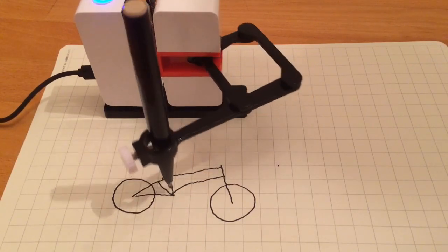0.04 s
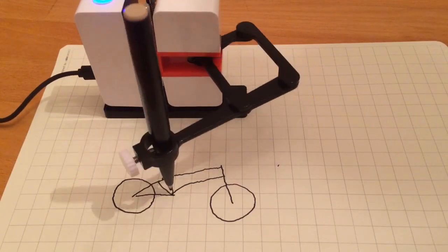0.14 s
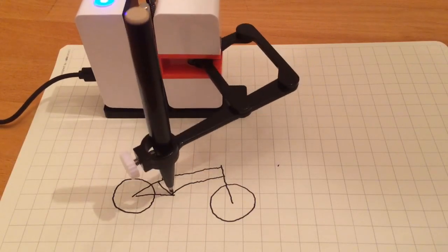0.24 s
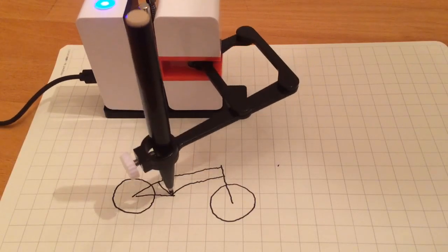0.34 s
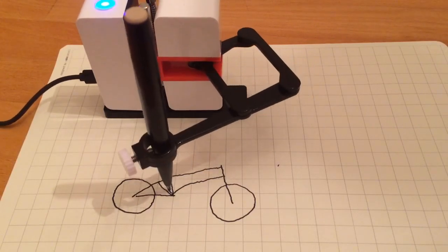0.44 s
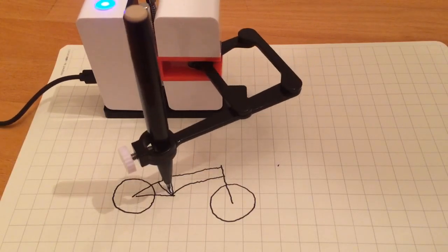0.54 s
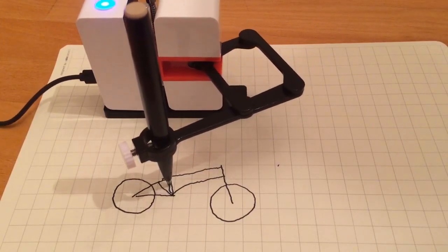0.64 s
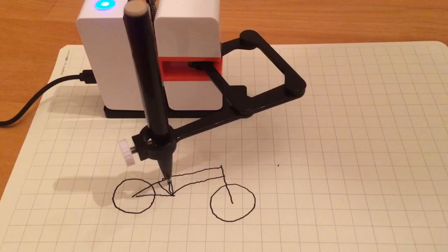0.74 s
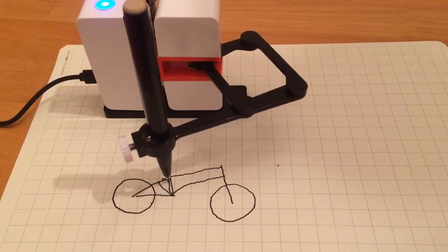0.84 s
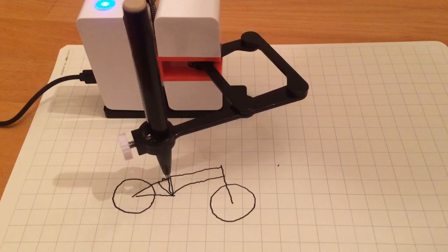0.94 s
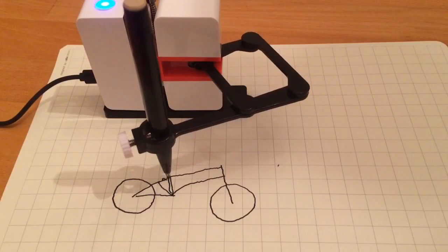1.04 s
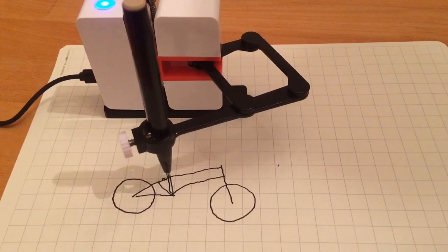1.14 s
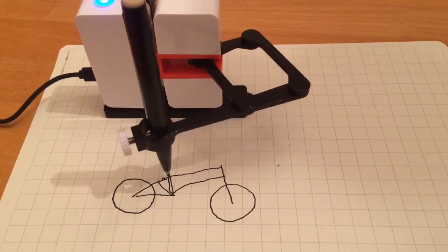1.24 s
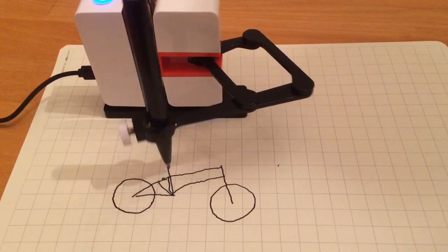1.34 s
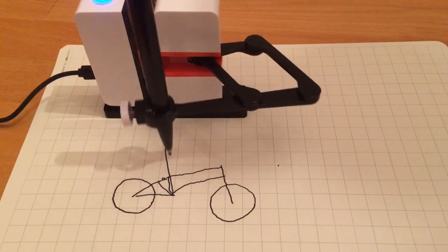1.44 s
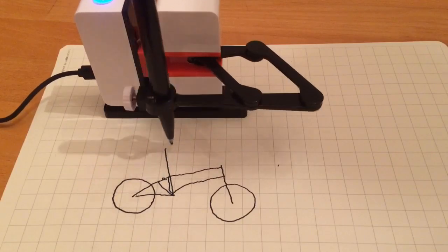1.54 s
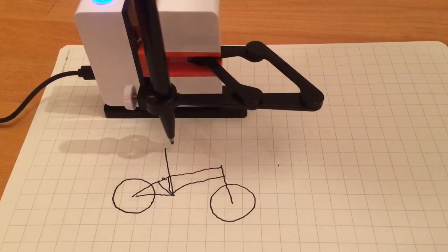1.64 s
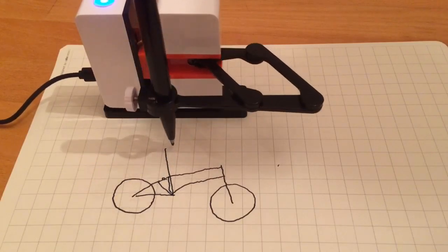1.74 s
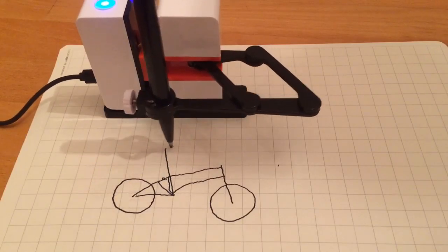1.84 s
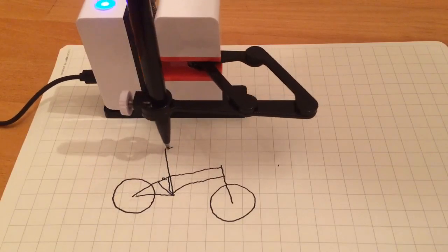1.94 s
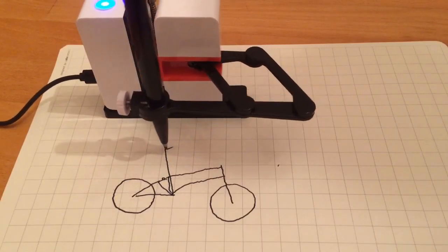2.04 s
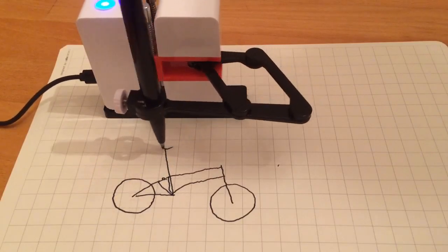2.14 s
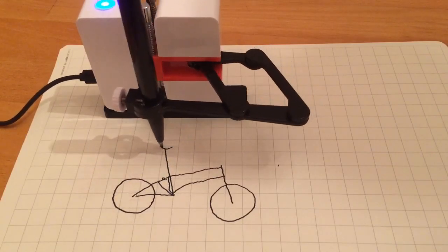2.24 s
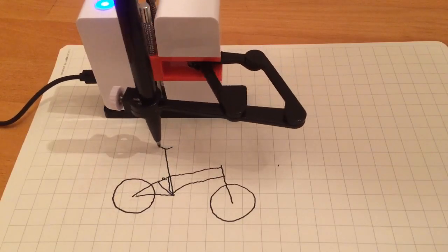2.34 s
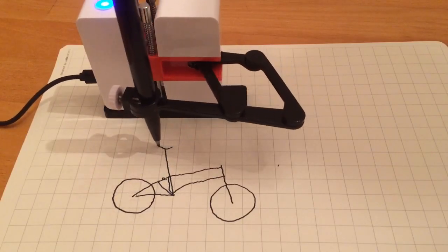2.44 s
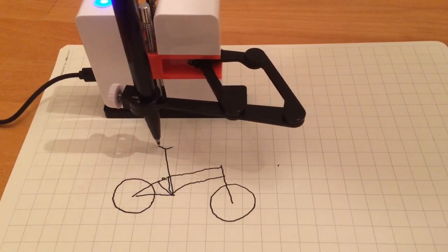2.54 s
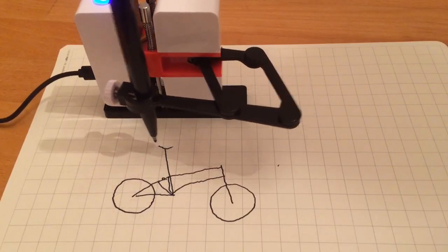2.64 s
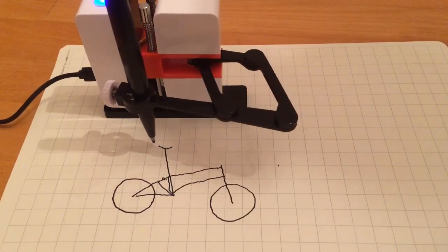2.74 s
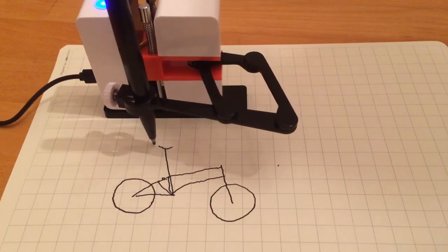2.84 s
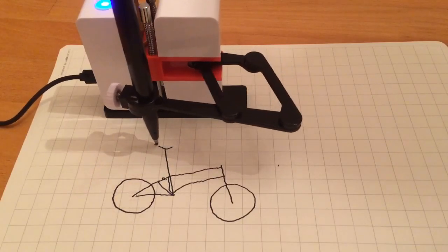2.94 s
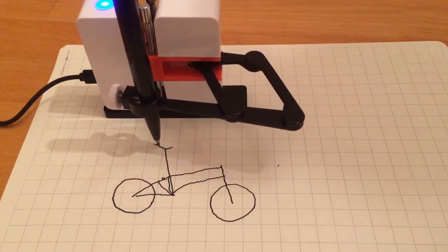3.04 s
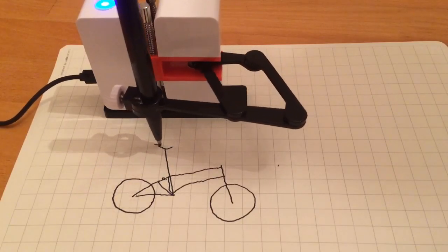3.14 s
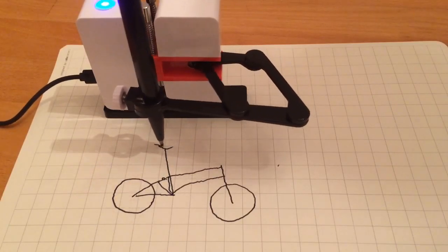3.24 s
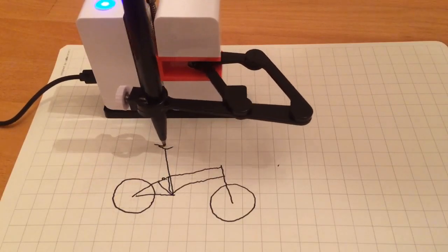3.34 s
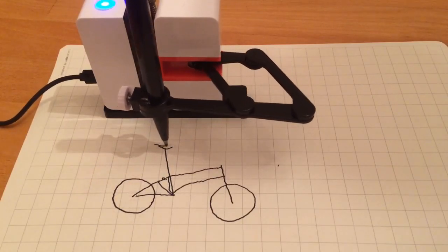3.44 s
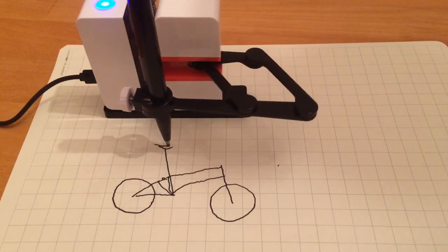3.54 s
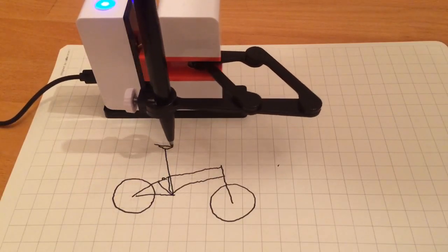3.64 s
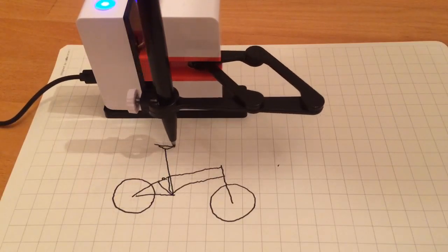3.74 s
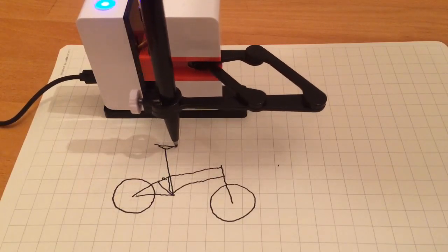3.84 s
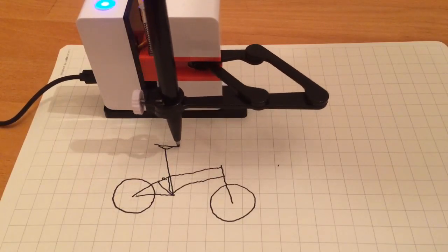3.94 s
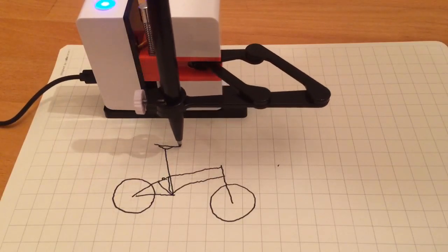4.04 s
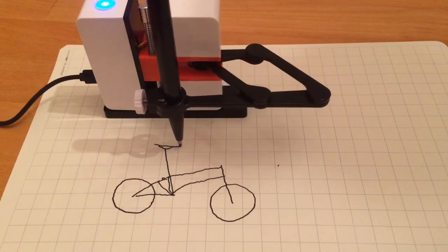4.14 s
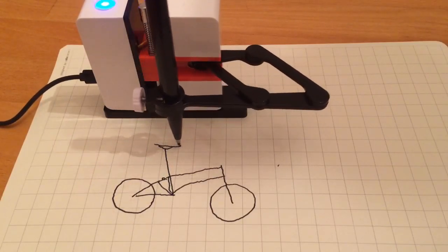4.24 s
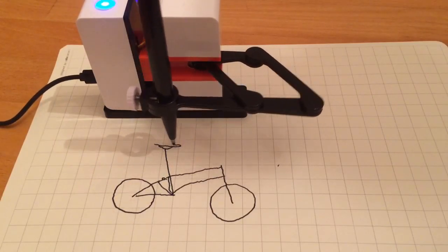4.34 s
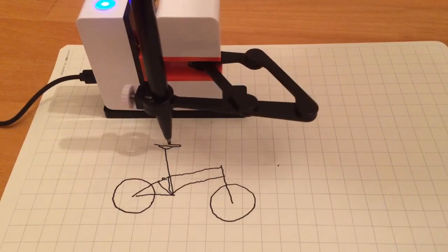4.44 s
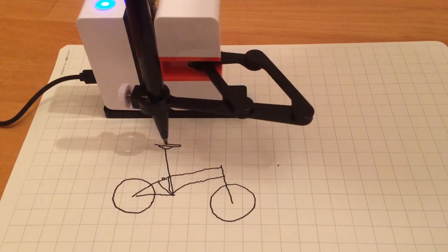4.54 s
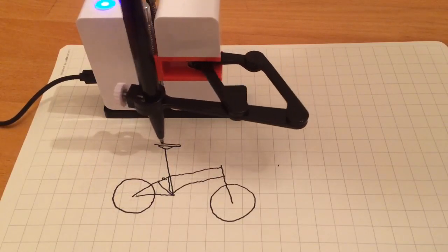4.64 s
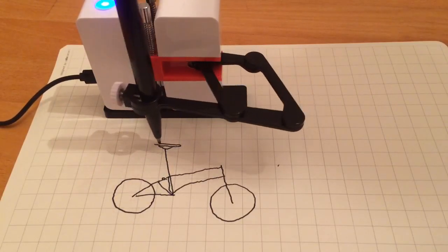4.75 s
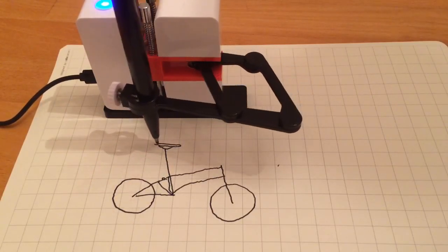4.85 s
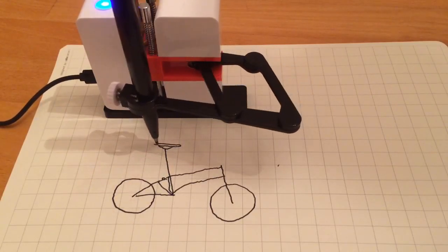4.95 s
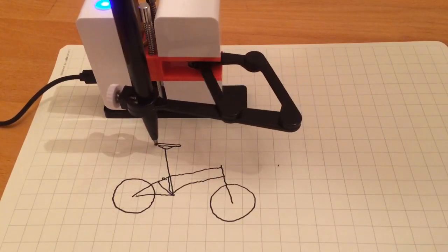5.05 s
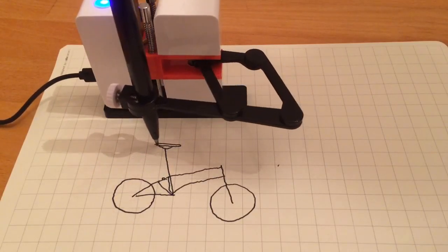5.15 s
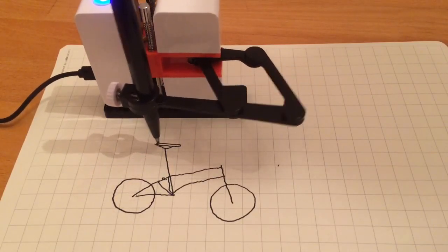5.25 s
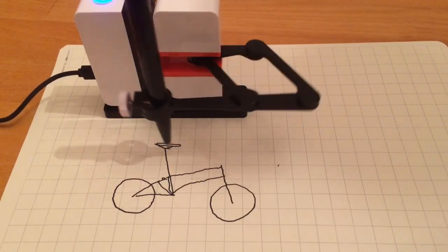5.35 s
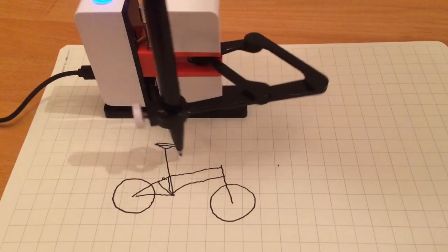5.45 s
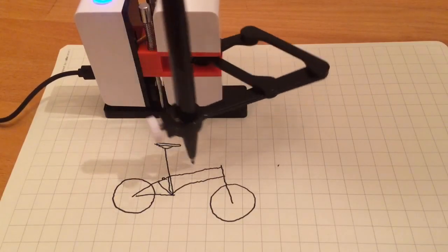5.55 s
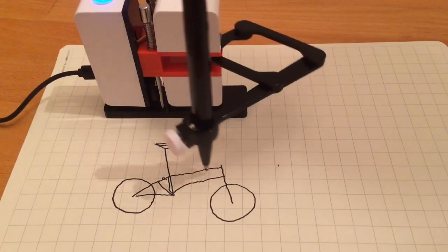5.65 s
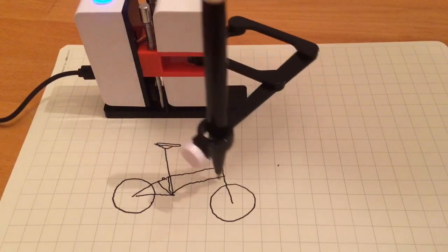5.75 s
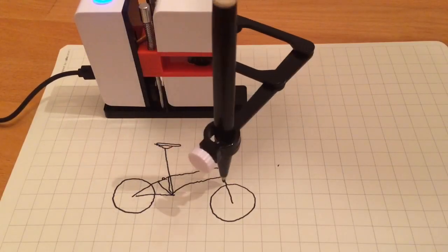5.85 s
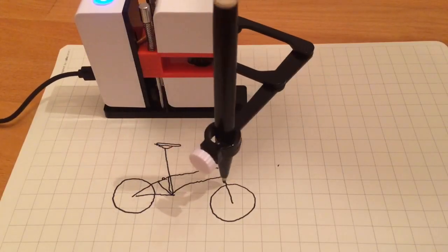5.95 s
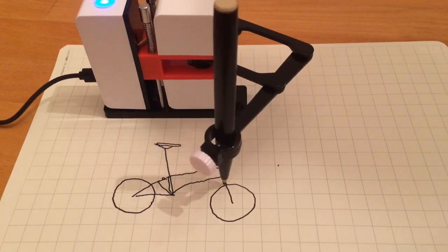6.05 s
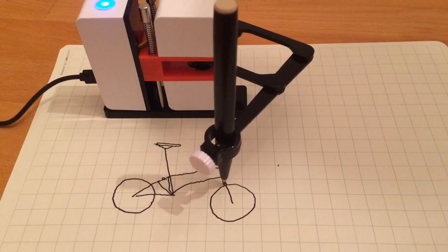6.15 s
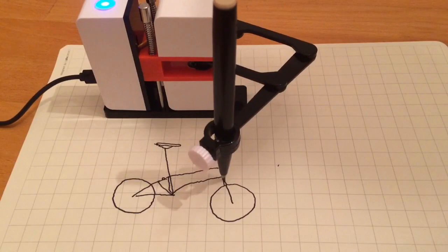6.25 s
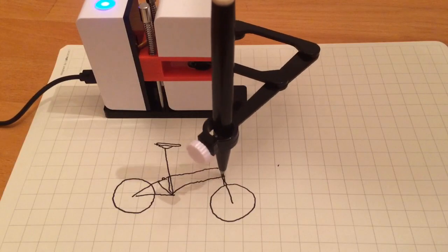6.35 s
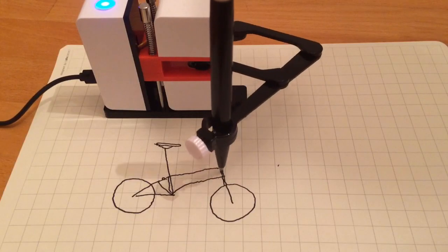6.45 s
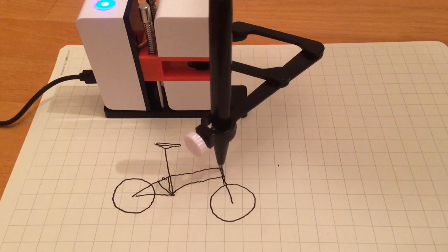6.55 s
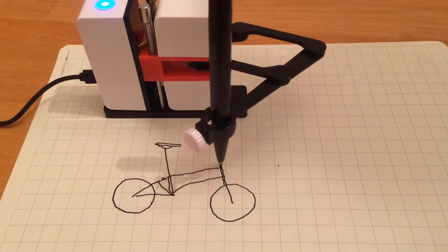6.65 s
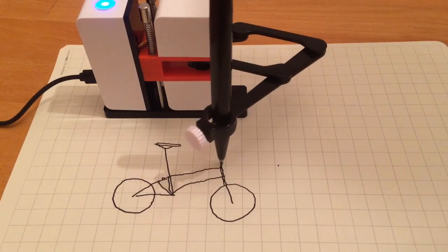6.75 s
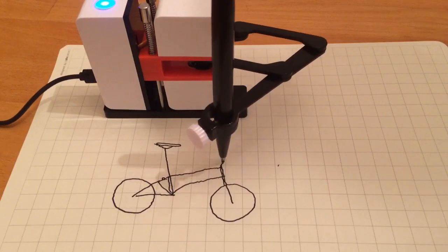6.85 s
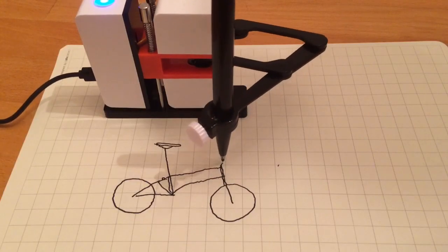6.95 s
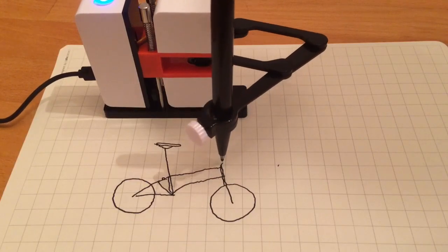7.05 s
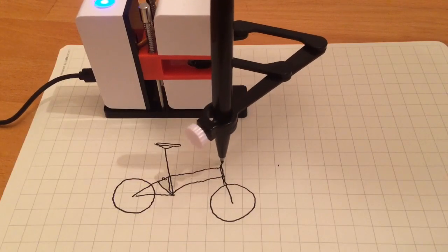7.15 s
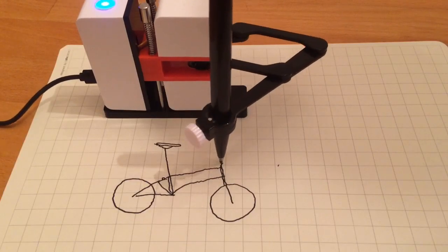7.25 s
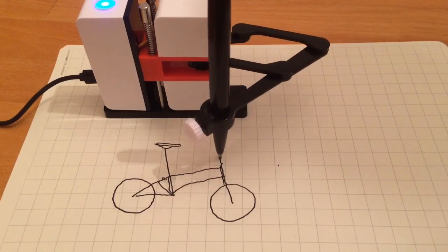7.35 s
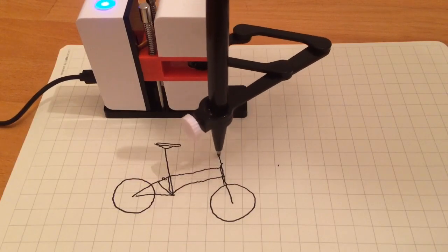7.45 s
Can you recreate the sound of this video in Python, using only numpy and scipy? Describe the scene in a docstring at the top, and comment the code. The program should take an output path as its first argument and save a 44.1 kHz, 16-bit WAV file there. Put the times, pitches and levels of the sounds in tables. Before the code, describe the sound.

The tail of an arm swing hisses and chirps, then a tiny servo buzzes the pen down with a click. Quiet ticking gear motion follows, broken by quick up and down whines and small plastic knocks. Later a longer hissing swing squeaks several times before more lift buzzes. Close microphone, quiet room, light desk thumps and faint steady hiss.

```python
"""The lift servo of a small desktop drawing robot raises and lowers the pen, close to one microphone: motor
orders follow the speed in a whine that arcs up and down over ringing gear noise, and each stroke ends in a knock.
The arm servos hiss through filtered tooth noise when they swing fast, squeal briefly in gliding tones, and creep
in ticking nudges while the pen draws. Low desk modes rumble under it all, with a faint hiss of room and microphone."""
import sys
import numpy as np
from scipy import signal
from scipy.fft import rfft, irfft
from scipy.io import wavfile

SR = 44100
rng = np.random.default_rng(int(sys.argv[2]) if len(sys.argv) > 2 else 0)


def inscribe(sig):
    """Save sig as 16-bit PCM at rate SR to the path in sys.argv[1].

    A 1-D sig is mono; a 2-D sig holds one channel per row.
    Samples are clipped to [-1, 1] before scaling.
    """
    pcm = np.round(np.clip(np.atleast_2d(sig).T, -1, 1) * 32767)
    wavfile.write(sys.argv[1], SR, pcm.astype(np.int16))


N = 330750
TIME = np.arange(N) / SR   # s

# Lift strokes that raise the pen: start_s, driven_s, braking_s, top_speed_hz,
# whine_db (reference for the motor orders), gear_db (gear noise at full speed)
RAISING = [(1.213, 0.2, 0.063, 511.4, -49, -41), (2.537, 0.19, 0.047, 516, -47.5, -42),
           (5.157, .185, 0.054, 515.3, -47.5, -41.5), (6.916, .186, .022, 516, -48.5, -43) ]
# Lift strokes that lower the pen, same columns
LOWERING = [(.234, 0.18, 0.033, 539.5, -51.5, -44), (1.734, .19, 0.034, 541, -50.5, -44),
            (2.757, 0.19, 0.032, 537, -50.5, -44), (5.995, .19, .033, 536, -50, -45),
            (7.122, 0.15, 0.04, 538.5, -49, -44)]


def lift_servo():
    """Tooth contacts ring the gearbox, coloured differently for each direction, under the whine of the motor."""
    # Motor orders while raising: full_speed_db, loss_db (per tenth of speed missing)
    raising_orders = [(-14, 4.5), (-6, 9), (2, 6.5), (-13, 6), (-10.5, 4), (-13, 6), (-19, 6), (-12, 1.5),
                      (-20, 21), (-14, 9), (-2, 14)]
    # Motor orders while lowering, same columns
    lowering_orders = [(-15, 3), (-24, 4), (0, 6.5), (0, 12), (-5.5, 4), (-12, 6), (-17, 6), (-9, 8),
                       (-20, 8), (-8, 8), (-26, 8)]
    # Gearbox resonances: pitch_hz, width_hz, raising_db, lowering_db
    gearbox = [(840, 660, -19.5, -12.5), (1526, 210, -5, -5), (3000, 404, -5.5, -0.5), (3570, 80, -2.5, 0),
               (3890, 200, -8.5, -7.5), (4900, 460, -11, -9.5), (5640, 280, -3.5, 2.5), (6970, 510, -2, -2),
               (7770, 340, -1, -0.5), (9120, 1000, -6.5, -5), (11460, 740, -4, -0.5),
               (12860, 460, -3, -1.5), (14440, 620, -5, -1)]
    contacts = teeth(3.4)
    raising_peaks = [(hz, width, db) for hz, width, db, _ in gearbox]
    lowering_peaks = [(hz, width, db) for hz, width, _, db in gearbox]
    raising_gears = rms_one(body(contacts, raising_peaks, flicker_db=0.44, flicker_rate=24))
    lowering_gears = rms_one(body(contacts, lowering_peaks, flicker_db=1.0, flicker_rate=14))
    up = lift(RAISING, raising_orders, raising_gears, spin_up_s=.021, waver_db=3.0, run_out_s=0.0031)
    down = lift(LOWERING, lowering_orders, lowering_gears, spin_up_s=.019, waver_db=0.9, run_out_s=0.023)
    return up + down


def lift(strokes, orders, gears, spin_up_s, waver_db, run_out_s):
    """The motor spins up, holds and brakes into the stop; its orders ride on the speed, the gears run out later."""
    # Multiples of the motor speed that are heard
    multiples = (1, 2, 3, 5, 6, 7, 8, 9, 10, 12, 27)
    speed_hz, missing, whine, grind = np.zeros((4, N))   # missing: tenths of top speed
    for start, driven, braking, top_hz, whine_db, gear_db in strokes:
        near = span(start, start + driven + braking + .05)
        since = TIME[near] - start
        left = driven + braking - since
        spin_up = 1 - np.exp(-np.maximum(since, 0) / spin_up_s)
        brake = 1 - .16 * np.clip((since - driven) / braking, 0, 1.5) ** 2
        speed = spin_up * brake
        running = (since > 0) & (left > -.01)
        speed_hz[near] += top_hz * speed * running
        missing[near] += 10 * (1 - speed) * running
        whine_gate = np.clip(since / 0.0081 - .6, 0, 1) * np.clip(left / 0.012 + .5, 0, 1)
        whine[near] += amp(whine_db) * whine_gate
        gear_gate = np.clip(since / 0.014, 0, 1) * np.clip((left + run_out_s) / 0.017, 0, 1)
        grind[near] += amp(gear_db + 4.3 * (speed - 1)) * gear_gate
    turn = 2 * np.pi * np.cumsum(speed_hz * (1 + 0.0023 * drift(47))) / SR
    tones = np.zeros(N)
    for k, (db, loss_db) in zip(multiples, orders):
        level = amp(db - loss_db * missing + waver_db * drift(52))
        tones += level * np.sin(k * turn + rng.uniform(0, 2 * np.pi))
    return np.sqrt(2) * whine * tones + grind * gears


def stops():
    """A short rattle of four contacts strikes every mode of the slide, each with a strength of its own."""
    # The slide meets its end of travel: time_s, strike_db, low_mode_db (extra for modes below 2 kHz)
    end_stops = [(0.4545, -24, 6), (1.4553, -29, 6), (1.956, -23, 2), (2.755, -27, 11), (2.9763, -21.5, 4),
                 (5.395, -28.5, 12), (6.2168, -27, 4.5), (7.116, -23.5, 6.5), (7.3183, -22.5, 2.5)]
    # Modes of the slide: pitch_hz, level_db, t60_s
    slide_modes = [(1424, -24, 0.03), (1617, -18, 0.03), (3042, 1, 0.016), (3490, -11, 0.028),
                   (3880, -18, 0.013), (5700, -14, 0.025), (7000, -20, 0.012)]
    take_up_s, take_up_db = .015, -31.5   # a raising stroke takes up its slack with a tick
    bounce_s, bounce_db = 0.019, -30   # a pen lowered from rest bounces once
    raised_s = [sum(stroke[:3]) for stroke in RAISING]
    from_rest = [stroke for stroke in LOWERING if all(abs(stroke[0] - end) > .05 for end in raised_s)]
    landed = [row for row in end_stops if any(abs(row[0] - sum(stroke[:3])) < .01 for stroke in from_rest)]
    take_ups = [(stroke[0] + take_up_s, take_up_db, 0) for stroke in RAISING]
    bounces = [(row[0] + bounce_s, bounce_db, 0) for row in landed]
    time_s, strike_db, low_db = np.transpose(list(end_stops) + take_ups + bounces)
    luck_db = rng.normal(0, 2, (len(time_s), len(slide_modes), 4))
    gaps_s = rng.uniform(.6, 1.4, (len(time_s), 4)) * [0.0003, 0.0013, 0.0022, 0.0035]
    at = ((time_s[:, None] + np.cumsum(gaps_s, axis=1)) * SR).astype(int)
    out = np.zeros(N)
    for k, (hz, level_db, t60) in enumerate(slide_modes):
        blow_db = strike_db + level_db + low_db * (hz < 2000)
        clicks = np.full(N, 1e-18)
        clicks[at] = amp(blow_db[:, None] + [-12, -8, -13, -16] + luck_db[:, k])
        r, w = amp(-60 / (t60 * SR)), 2 * np.pi * hz / SR
        out += signal.lfilter([0, np.sin(w)], [1, -2 * r * np.cos(w), r * r], clicks)
    return signal.lfilter([.15, .2, .3, .2, .15], [1], out)   # a soft contact


def swing():
    """Fast arm moves: a dense, throbbing hiss and a faint motor hum; the gear stages fade before the housing."""
    # Fast moves: start_s, end_s, housing_start_db, housing_end_db, then over the housing
    # first_stage_start_db, first_stage_end_db, upper_stages_db; throb_db (depth)
    fast_moves = [(-.05, 0.157, -50.5, -50, 0.29, -2.5, 4.4, .8),
                  (1.474, 1.643, -51.5, -58, 9.9, 8.5, 6.6, 1.9),
                  (5.393, 5.883, -48.5, -52, 2.1, 1.7, 6.5, 0.85)]
    # Resonances of the swinging arm: pitch_hz, width_hz, level_db
    swing_peaks = [(1554, 107, 0.5), (2420, 560, -2), (2700, 450, 2), (3520, 400, -2), (4970, 400, -2),
                   (6150, 590, -2.5), (7540, 620, -6), (8420, 140, -7), (8660, 760, 2), (10800, 450, -3),
                   (12100, 880, -5.5), (14470, 480, -0.5)]
    throb_hz, hum_hz, release_s = 65.5, 592, 0.044   # the throb is one turn of a gear
    level, first_db, upper_db = np.zeros((3, N))
    throb = np.cos(2 * np.pi * np.cumsum(throb_hz * amp(1.2 * drift(15))) / SR)
    for start, end, from_db, to_db, first_from_db, first_to_db, top_db, throb_db in fast_moves:
        gate = during(start - .03, end, 0.025, release_s)
        level += gate * amp(np.interp(TIME, [start, end], [from_db, to_db]) + throb_db * throb)
        run_out_db = 8 * (during(start - 1, end, 1, release_s) - 1)
        first_line_db = np.interp(TIME, [start, end], [first_from_db, first_to_db])
        first_db += (gate > 0) * (first_line_db + run_out_db)
        upper_db += (gate > 0) * (top_db + run_out_db)
    hiss = arm(teeth(2.8), swing_peaks, first_db, upper_db, flicker_db=1.8)
    wandering_hz = hum_hz * (1 + .02 * drift(4) + .025 * drift(40))
    hum = unsteady(wandering_hz, level_db=-22.5, waver_db=4.5, rate=24.5)
    return level * amp(.8 * drift(8)) * (hiss + hum)


def squeals():
    """Gears squeal briefly during a swing: each squeal is a rough gliding tone that swells and dies."""
    # Squeals: middle_s, length_s, from_hz, to_hz, level_db (swell, before the tone's own gain and waver)
    squeal_glides = [(0.056, 0.052, 2750, 2520, -49), (0.132, 0.046, 3450, 3400, -57.5),
                     (1.505, 0.085, 4750, 5050, -48.5), (1.585, 0.1, 5100, 4850, -52),
                     (5.526, .06, 2780, 2550, -49), (5.633, .05, 2900, 2750, -53),
                     (5.758, 0.036, 2750, 2680, -51), (5.79, 0.043, 2550, 2450, -51),
                     (5.87, .04, 2800, 2700, -56)]
    pitch_hz, swell = np.zeros((2, N))
    for middle, length, from_hz, to_hz, level_db in squeal_glides:
        near = span(middle - length / 2, middle + length / 2)
        place = (TIME[near] - middle) / length   # -.5 to .5 while it sounds
        pitch_hz[near] = from_hz + (to_hz - from_hz) * (place + .5)
        swell[near] = amp(level_db) * np.cos(np.pi * place)
    return swell * unsteady(pitch_hz, level_db=1.0, waver_db=4.5, rate=87.0)


def creep():
    """Slow arm moves: teeth tick over, surging at every command, while motor current pulses modulate and sing."""
    # Creeping along a line or settling after a swing: start_s, end_s, command_step_s, housing_start_db,
    # housing_end_db, surge_db (over the housing), first_stage_db, upper_stages_db (both over the housing)
    slow_moves = [(.19, .235, 0.042, -69.5, -64.5, 1.5, -1, -6),
                  (.458, .864, 0.06, -63, -64.5, -8.5, 1, -0.5),
                  (.864, 1.165, 0.059, -63.5, -68.5, -3.5, 1, -2),
                  (1.665, 1.735, .022, -69, -72.5, -5.5, 0.5, -5),
                  (1.955, 2.508, 0.087, -63, -64, 0, -1, -2),
                  (2.949, 3.633, .057, -66.5, -64.5, -1.5, -2.5, -3),
                  (3.633, 4.165, 0.054, -63, -69.5, 1, -5, -1), (4.275, 4.45, .06, -62.5, -58.5, -15, 1, 0),
                  (4.45, 4.603, 0.0904, -57.5, -66, -10, 3.5, 2),
                  (4.603, 4.875, .057, -61.5, -65.5, -5, -1, -1.5),
                  (4.875, 5.16, 0.058, -68, -65.5, 3.5, -3.5, -1.5),
                  (5.91, 6.0, 0.027, -65.5, -69, -6.5, -0.5, -3),
                  (6.23, 6.625, 0.072, -64, -66, -5.5, 1.5, 1),
                  (6.63, 6.838, 0.053, -64.5, -68.5, -2, 0.5, -0.5),
                  (6.849, 6.91, .029, -68, -71.5, 8, -8, 0), (7.33, 7.55, .065, -60, -64.5, -16, 0.5, 0.5)]
    # Resonances of the creeping arm: pitch_hz, width_hz, level_db
    creep_peaks = [(936, 38, -2.5), (1592, 97, 1), (2605, 180, 2), (2983, 64, 5), (3284, 223, 2.5),
                   (3974, 116, 5), (4860, 255, 3), (5950, 580, 1), (7360, 860, -8.5), (8740, 1000, -12.5),
                   (10200, 1250, -19), (11500, 710, -19), (12500, 900, -20), (14800, 400, -16)]
    # The arm twitches while it stands between lines: time_s, housing_db
    twitches = [(1.18, -66), (1.197, -62), (1.208, -57.5), (1.704, -58), (1.717, -66), (1.727, -67),
                (2.514, -59), (2.528, -52), (4.146, -61.5), (4.185, -60), (4.199, -61.5), (4.214, -55),
                (4.225, -60.5), (4.247, -63), (4.263, -60)]
    # Song of the current pulses: multiple (of the pulse rate), peak_db (before waver)
    drive_tones = [(2, -79), (3, -80.5), (5, -108.5), (6, -78.5), (7, -81)]
    drive_hz, surge_rise_s, surge_s, twitch_s = 306.8, 0.002, 0.024, .0045
    settle_db, settle_s = -59, 0.039   # the arm shakes on after the pen lands
    tick_db, tick_per_db = 3.9, .25   # tick depth at -64 dB effort, and its growth per dB of slowness
    effort, moving, first_db, upper_db = np.zeros((4, N))
    for start, end, step_s, from_db, to_db, surge_db, first, upper in slow_moves:
        gate = during(start, end, .003, .008)
        near = span(start, end + .01)
        since = np.clip(TIME[near] - start, 0, 1) % step_s   # s since the last command
        surge = np.minimum(since / surge_rise_s, 1) * np.exp(-(since / surge_s) ** 2)
        housing = amp(np.interp(TIME[near], [start, end], [from_db, to_db]))
        effort[near] += gate[near] * housing * (1 + amp(surge_db) * surge)
        moving = np.maximum(moving, gate)
        first_db[near], upper_db[near] = first, upper
    for stroke in LOWERING:
        since = TIME - sum(stroke[:3])
        effort += amp(settle_db) * (since > 0) * np.exp(-np.abs(since) / settle_s)
    slowness_db = np.clip(-64 - 20 * np.log10(effort + 1e-9), -8, 8)   # a quieter arm counts as slower
    # teeth pass unevenly, and less often as the arm slows
    tooth_hz = 105 * amp(2 * drift(12) - .5 * slowness_db)
    tooth = 2 * np.pi * np.cumsum(tooth_hz) / SR
    tick = np.cos(tooth + .7 * np.cos(tooth))
    effort *= amp((tick_db + tick_per_db * slowness_db) * tick + 1.3 * drift(62))
    for time_s, level_db in twitches:
        near = span(time_s, time_s + 4 * twitch_s)
        since = TIME[near] - time_s
        effort[near] += amp(level_db) * np.clip(since / 0.00069, 0, 1) * np.exp(-(since / twitch_s) ** 2)
    turn = 2 * np.pi * drive_hz * TIME
    pulsed = teeth(1.8) * (1 + .28 * np.cos(turn))
    song = sum(amp(db + 2.9 * drift(11.0)) * np.sin(k * turn + k) for k, db in drive_tones)
    return effort * arm(pulsed, creep_peaks, first_db, upper_db, flicker_db=2.0) + moving * song


def arm(contacts, case, first_db, upper_db, flicker_db):
    """The housing rings below 4.5 kHz, the first gear stage up to 6.7 kHz, the finer stages above."""
    bands_hz = ((0, 4500), (4500, 6700), (6700, SR))
    parts = [[peak for peak in case if low <= peak[0] < high] for low, high in bands_hz]
    housing, first, upper = (rms_one(body(contacts, part, flicker_db, 7.4)) for part in parts)
    return housing + amp(first_db) * first + amp(upper_db) * upper


def desk():
    """Low modes of the desk top take up the motion: swells with lift strokes and jolts, thumps under lowering."""
    # Modes of the desk top: pitch_hz, width_hz, level_db
    desk_peaks = [(52.5, 21.6, -11), (74, 26.7, -3.5), (101.7, 12, 2), (129.1, 8.9, -1),
                  (168.6, 28.5, -7.5), (190, 24.2, -6.5), (282, 58, -22.5)]
    # The arm jolts the desk top: time_s, level_db (added rumble)
    arm_jolts = [(.1, -69), (.85, -71), (1.11, -69), (4.78, -77), (5.52, -67), (5.82, -60), (6.35, -62),
                 (7.42, -65)]
    rest_db, raise_db, lower_db = -65, -54.5, -59.5   # rumble at rest; added at mid-raise and while lowering
    thump_db, thump_s, thump_hz, jolt_s = -47, 0.019, 84, 0.034   # each thump's pitch varies around thump_hz
    level, thumps = amp(rest_db + 0.75 * drift(2.1)), np.zeros(N)
    for start, driven, braking, *_ in RAISING:
        place = np.clip((TIME - start) / (driven + braking + 0.055), 0, 1)
        level += amp(raise_db) * np.sin(np.pi * place) ** 2
    for time_s, level_db in arm_jolts:
        level += amp(level_db) * bump(time_s, jolt_s)
    for start, driven, braking, *_ in LOWERING:
        end = start + driven + braking
        level += amp(lower_db) * during(start, end, 0.079, 0.068)
        # one thump as the stroke gets under way, a stronger one as it brakes
        for time_s, level_db in ((start + .055, thump_db - 7), (end - .005, thump_db)):
            near = span(time_s - .15, time_s + .15)
            cycles = thump_hz * rng.uniform(.9, 1.15) * TIME[near] + rng.random()
            thumps[near] += amp(level_db) * bump(time_s, thump_s)[near] * np.sin(2 * np.pi * cycles)
    rumble = rms_one(body(rng.standard_normal(N), desk_peaks, flicker_db=2.4, flicker_rate=1.53))
    return level * rumble + thumps


def room():
    """Steady faint hiss of room and microphone: noise shaped in the spectrum."""
    # Relative spectrum of the hiss: pitch_hz, density_db (per Hz)
    hiss_curve = [(30, -18), (106, -23), (300, -15), (600, -14), (1100, -19), (2500, -19), (8000, -24.5),
                  (12000, -31.5), (16000, -42)]
    hz = np.maximum(np.fft.rfftfreq(N, 1 / SR), 1)
    at_hz, density_db = np.transpose(hiss_curve)
    shape = amp(np.interp(np.log(hz), np.log(at_hz), density_db))
    hiss = irfft(rfft(rng.standard_normal(N)) * shape, N)
    return amp(-69) * rms_one(hiss)   # rms level in dB


def teeth(spread_db):
    """Dense tooth and brush contacts of uneven size."""
    return rng.standard_normal(N) * amp(spread_db * np.minimum(rng.exponential(1, N), 5))


def body(x, peaks, flicker_db, flicker_rate):
    """Parallel resonances of alternating sign, each flickering in level on its own."""
    out = np.zeros(N)
    for k, (hz, width, db) in enumerate(peaks):
        level = amp(db + flicker_db * drift(flicker_rate))
        out += (-1) ** k * level * resonate(x, hz, width)
    return out


def resonate(x, hz, width_hz):
    """One two-pole resonance, gain 1 on top."""
    r = np.exp(-np.pi * max(width_hz, 5) / SR)
    zeros = np.array([1, 0, -1]) * (1 - r * r) / 2
    return signal.lfilter(zeros, [1, -2 * r * np.cos(2 * np.pi * hz / SR), r * r], x)


def unsteady(hz, level_db, waver_db, rate):
    """A tone that comes and goes and never holds its pitch exactly."""
    phase = 2 * np.pi * np.cumsum(hz * (1 + 0.01215 * drift(rate))) / SR
    return amp(level_db + waver_db * drift(rate)) * np.sin(phase)


def drift(rate):
    """Slow random wander of rms 1: noise at SR / 40 through two equal low-pass poles at rate Hz."""
    r = np.exp(-80 * np.pi * rate / SR)
    noise = rng.standard_normal(N // 40 + 2002)
    slow = signal.lfilter([1], [1, -2 * r, r * r], noise)[2000:]   # past the filter's start-up
    return np.interp(np.arange(N) / 40, np.arange(len(slow)), rms_one(slow))


def during(start, end, rise_s, fall_s):
    """A gate that rises after the start and falls after the end."""
    return np.clip(np.minimum((TIME - start) / rise_s, (end - TIME) / fall_s + 1), 0, 1)


def bump(middle, width_s):
    """A bell-shaped swell."""
    out, near = np.zeros(N), span(middle - 4 * width_s, middle + 4 * width_s)
    out[near] = np.exp(-((TIME[near] - middle) / width_s) ** 2)
    return out


def span(start, end):
    """The samples between two times in seconds."""
    return slice(max(int(start * SR), 0), int(end * SR))


def amp(db):
    """Gain of a level in dB."""
    return 10 ** (np.asarray(db) / 20)


def rms_one(x):
    """Scaled to rms 1."""
    return x / np.sqrt(np.mean(x ** 2) + 1e-20)


def scene():
    """All sources reach one microphone, heard alike in both channels."""
    robot = lift_servo() + stops() + swing() + squeals() + creep()
    return np.tile(robot + desk() + room(), (2, 1))


def record(dry):
    """A steep low-pass cuts the top: 70 dB down from 16250 Hz upward."""
    return signal.sosfilt(signal.cheby2(16, 70, 16250, fs=SR, output="sos"), dry)


dry = scene()
out = record(dry)
inscribe(out)
```